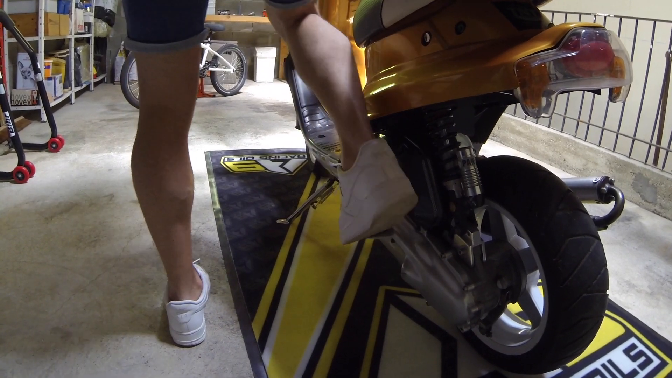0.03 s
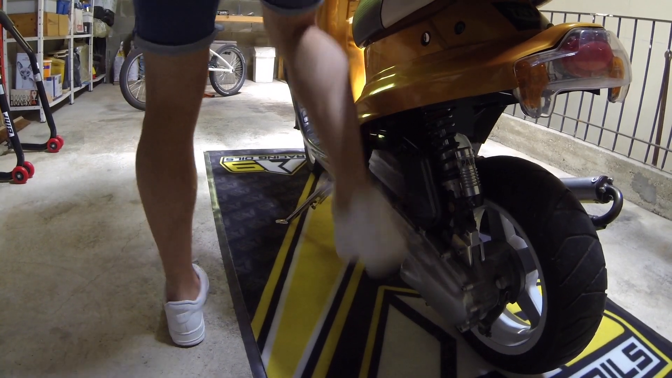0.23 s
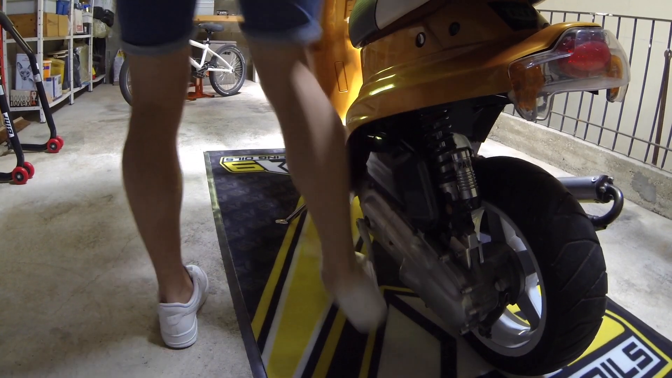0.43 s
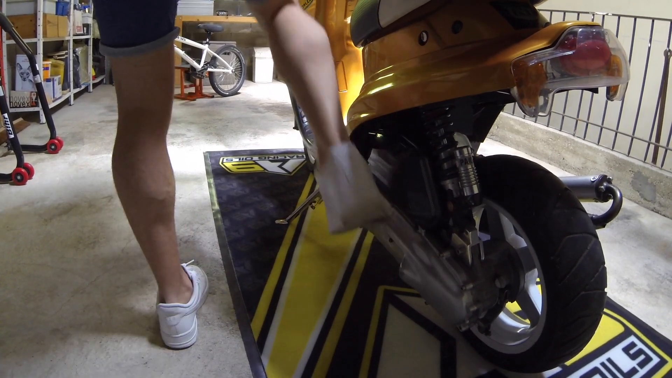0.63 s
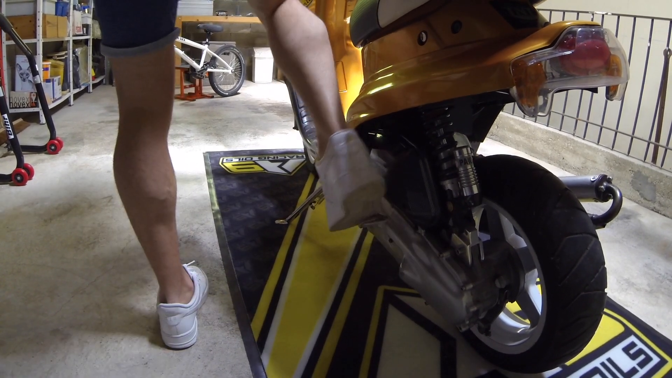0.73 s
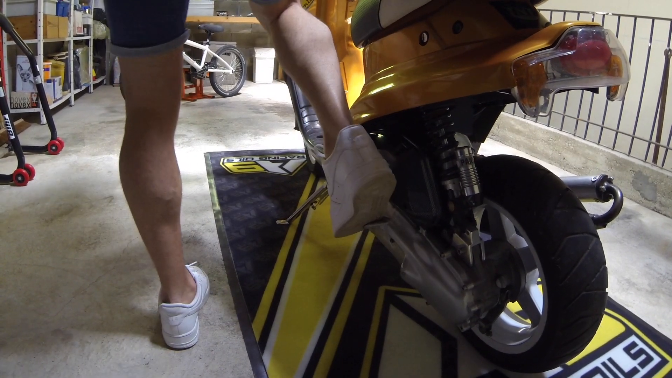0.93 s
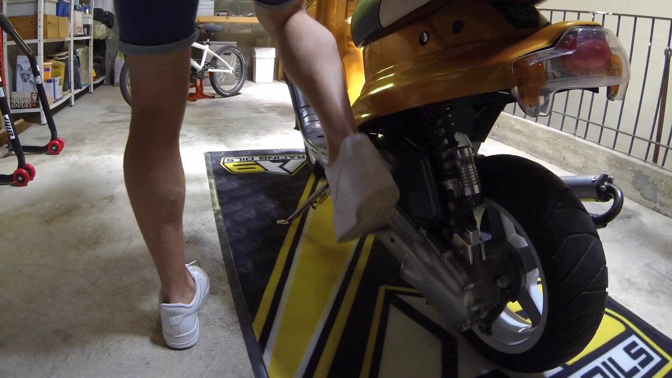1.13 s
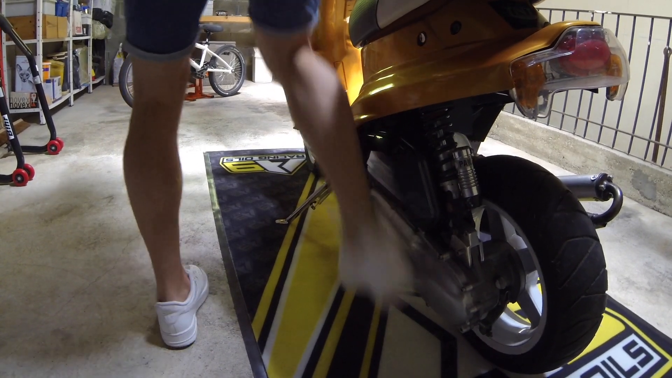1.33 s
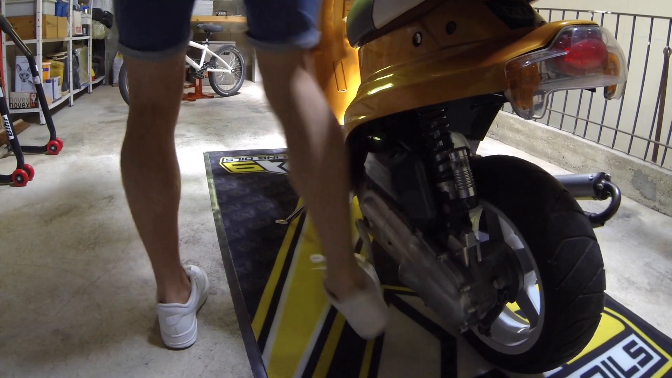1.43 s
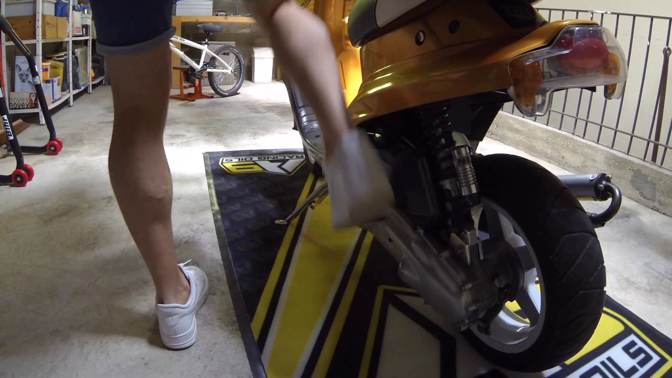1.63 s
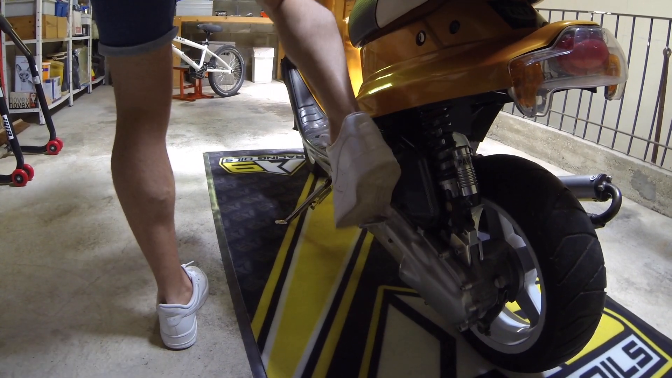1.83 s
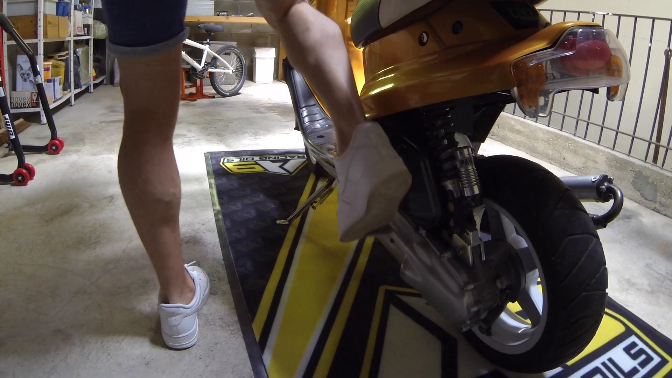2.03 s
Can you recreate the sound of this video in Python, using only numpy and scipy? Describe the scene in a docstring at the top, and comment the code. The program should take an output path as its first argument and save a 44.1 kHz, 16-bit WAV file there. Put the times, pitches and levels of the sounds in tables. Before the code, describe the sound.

Two clanking kicks on a scooter's starter lever turn the engine over without starting it.

```python
"""A starter gear clacks into mesh in a bare garage: a two-stroke scooter is kicked over twice
and does not fire. Each time the gear teeth whirr under the foot and the lever slams on its stop,
exciting the resonances of the transmission case. The piston chuffs cold gas through the exhaust
and loose parts rattle as the engine coasts to rest. Then the lever springs back and rings in its
own modes. The hard walls answer every sound with a short echo."""
import sys
import numpy as np
from scipy import signal
from scipy.fft import rfft, irfft
from scipy.io import wavfile

SR = 44100
rng = np.random.default_rng(int(sys.argv[2]) if len(sys.argv) > 2 else 0)


def waveform_to_disk(signal):
    """Save audio, clipped to [-1, 1], as 16-bit WAV at the path in sys.argv[1]."""
    frames = np.transpose(np.atleast_2d(signal))
    scaled = np.clip(frames, -1, 1) * 32767
    samples = np.round(scaled).astype(np.int16)
    wavfile.write(sys.argv[1], SR, samples)


N = 92610
TIME = np.arange(N) / SR
FFT_SIZE = 2 ** 17
HZ = np.maximum(np.arange(FFT_SIZE // 2 + 1) * SR / FFT_SIZE, 1)

# Still air and distant rumble. Each row: frequency in Hz, gain in dB.
AIR_COLOUR = [(20, -3), (40, 4), (70, -7.5), (110, -15), (200, -20.5), (400, -24), (750, -24.5),
              (1300, -32.5), (2500, -38.5), (5000, -46.5), (9000, -52.5), (15000, -55.5)]
# Decay of the garage. Each row: frequency in Hz, T60 in seconds.
GARAGE_DECAY = [(60, 0.2), (200, .7), (450, 0.64), (750, .7), (1500, 0.53), (3000, 0.39), (6000, 0.52),
                (13000, 0.17)]
# Spectrum of the echo. Each row: frequency in Hz, gain in dB.
GARAGE_COLOUR = [(60, 6), (130, 0.5), (280, 3.5), (500, 3), (800, 0), (1500, 0.5), (2600, 3), (4000, -2),
                 (6000, 1), (13000, -3)]

# The return spring ticks. Each row: start in seconds, relative level in dB.
TICKS = [(.084, -16), (.358, 11), (0.724, -4), (1.461, 1), (1.493, -4.5), (1.708, 2), (1.783, 1.5)]
# Spectrum of a tick. Each row: frequency in Hz, gain in dB.
TICK_COLOUR = [(2000, 25), (6500, -12), (9700, 8.5), (11000, 0.5), (12000, 1), (15000, -13)]

# The drive rubs. Each row: centre in seconds, level in dB, Gaussian half length in seconds.
SQUEAKS = [(1.468, -37.5, .016), (1.559, -38, 0.017)]
# Partials of a squeak. Each row: frequency in Hz, width in Hz, gain in dB.
SQUEAK_PARTIALS = [(1272, 64, -3.5), (1850, 61, -11)]
# The coasting drive rattles, one curve a kick. Each row: time in seconds, level in dB.
RATTLE_CURVES = [
    [(.29, -31), (.36, -56), (.44, -31), (.5, -46), (.58, -45.5), (.63, -64.5)],
    [(1.33, -47), (1.4, -41), (1.47, -35.5), (1.52, -43.5), (1.565, -42.5), (1.62, -49), (1.68, -55)],
]
# Spectrum of the rattle. Each row: frequency in Hz, gain in dB.
RATTLE_COLOUR = [(120, -6), (420, 3.5), (750, 6.5), (1050, 4.5), (1900, -3), (3500, -9), (5500, -21.5),
                 (8000, -35.5), (12000, -34.5), (15000, -45)]

# The gear whirrs under the foot, one curve a kick. Each row: time in seconds, level in dB.
WHIRR_CURVES = [
    [(.15, -56), (.195, -40.5), (.216, -27.5), (.25, -29), (.278, -29.5), (.33, -32), (.39, -47)],
    [(1.19, -49), (1.21, -46), (1.23, -42.5), (1.255, -26.5), (1.285, -31), (1.315, -24.5), (1.37, -39),
     (1.42, -45)],
]
# Spectrum of the whirr. Each row: frequency in Hz, gain in dB.
WHIRR_COLOUR = [(120, -15), (250, -6), (440, -1.5), (560, -8.5), (720, 6.5), (860, 2), (1000, -9.5),
                (1250, -11), (1600, -17.5), (2600, -24), (3800, -27.5), (6500, -46), (14000, -60)]

# The engine turns over, runs down and rocks back; the row at 1.082 s is a low thump as the foot loads the
# lever. Each row: start in seconds, relative level in dB.
CHUFFS = [(.208, 3), (0.257, 6), (.308, 6), (0.361, 0), (.425, -1), (.53, -1.5), (1.082, -13), (1.244, 1),
          (1.295, 6.5), (1.35, 3), (1.408, -0.5), (1.482, -1), (1.584, -2), (1.64, -9.5), (1.772, -9),
          (1.849, -15)]
# Spectrum of a chuff. Each row: frequency in Hz, gain in dB.
CHUFF_COLOUR = [(25, -10), (55, -2.5), (85, -4.5), (125, 6), (180, -13), (240, -6.5), (380, -25.5),
                (900, -38), (3000, -61.5)]

# Resonances of the transmission case. Each row: frequency in Hz, nominal width in Hz, lift in dB.
CASE_RESONANCES = [(440, 69, 4), (782, 370, 13), (1268, 100, 11.5), (1836, 99, 11), (2327, 110, 5.5),
                   (3120, 240, 10.5), (3420, 150, 8.5), (3930, 200, 11.5), (5390, 350, 13),
                   (8800, 970, 6.5), (12300, 820, 5)]
# The slack drive knocks on the case. Each row: start in seconds, relative level in dB.
BACKLASH = [(.433, -7), (0.454, 0.5)]
# Spectrum of that knock. Each row: frequency in Hz, gain in dB.
BACKLASH_COLOUR = [(100, -10), (450, 1.5), (1000, -7.5), (1850, 2.5), (2500, -10.5), (3200, 0), (4500, -9),
                   (7000, -14.5), (12000, -19.5), (15000, -30)]

# The starter gear goes in and out of mesh.
# Each row: start in seconds, relative level in dB, treble gain in dB, contact time in seconds.
CLACKS = [(0.0614, -14, -14.5, 0.01), (0.082, -11, -4, 0.016), (.163, -24.5, -14, 0.0052),
          (0.2019, -11.5, -21, 0.009), (.566, -8, -17, 0.0039), (.833, -26, -16.5, .008),
          (1.019, 2.5, -5.5, 0.008), (1.084, 1.5, -2.5, 0.0082), (1.207, -22, -18, 0.009),
          (1.236, -12.5, -12, 0.0095), (1.558, -5.5, -6, 0.014), (1.916, 3, -17, 0.0075),
          (1.9882, -8.5, -30, 0.0072)]
# Spectrum of a clack. Each row: frequency in Hz, gain in dB.
CLACK_COLOUR = [(60, -23.5), (200, -8.5), (450, 1.5), (1500, -3.5), (2600, -6.5), (4300, -11),
                (4900, -16.5), (8000, -29.5), (12000, -28.5), (15000, -53)]
# Resonances of the gear. Each row: frequency in Hz, nominal width in Hz, lift in dB.
GEAR_RESONANCES = [(783, 260, 11.5), (1114, 73, 10.5), (1830, 150, 9), (2420, 57, 9), (2980, 240, 11),
                   (3640, 200, 14), (4234, 200, 8)]

# The lever springs back to its top stop. Each row: start in seconds, relative level in dB.
RETURNS = [(0.6437, 1), (1.6928, 2)]
# Spectrum of that impact. Each row: frequency in Hz, gain in dB.
RETURN_COLOUR = [(80, -20), (220, -12.5), (450, 6), (750, 3), (1200, -3.5), (1900, -3), (2600, -4.5),
                 (3300, -9.5), (4600, -9.5), (6000, -22.5), (12000, -38.5), (15000, -60)]
# Resonances of the top stop. Each row: frequency in Hz, nominal width in Hz, lift in dB.
TOP_STOP_RESONANCES = [(2500, 180, 3.5), (3960, 360, 8.5), (5150, 320, 5)]
# Modes of the lever. Each row: frequency in Hz, relative level in dB, T60 in seconds.
LEVER_MODES = [(720, -34, .25), (773.4, -26, 0.16), (859, -32.5, 0.22), (1580, -56, .25),
               (1877, -51.5, 0.39), (2732, -45, 0.12)]

# The lever slams on its bottom stop. Each row: start in seconds, relative level in dB.
SLAMS = [(0.2773, 1), (1.3167, 0)]
# Spectrum of a slam. Each row: frequency in Hz, gain in dB.
SLAM_COLOUR = [(40, -9), (130, 2), (300, 4), (700, -4), (1100, -7.5), (2200, -5), (3600, -7), (4700, -12.5),
               (7000, -24.5), (10000, -24), (15000, -38)]


def amp(db):
    """Amplitude grows tenfold every 20 dB."""
    return 10 ** (np.asarray(db) / 20)


def unit_rms(x):
    """Normalisation to unit mean power."""
    return x / np.sqrt(np.mean(x ** 2) + 1e-20)


def decay(age, t60):
    """Exponential damping: 60 dB in t60 seconds."""
    return np.exp(-np.log(1000) * age / t60)


def at_hz(table, hz):
    """Interpolation on a log-frequency axis."""
    frequencies, values = np.transpose(table)
    return np.interp(np.log(hz), np.log(frequencies), values)


def envelope(curves):
    """Amplitude envelope from dB curves, silent outside them."""
    return sum(amp(np.interp(TIME, *np.transpose(c), left=-np.inf, right=-np.inf)) for c in curves)


def body(x, colour, resonances=()):
    """A minimum-phase filter: a broad colour plus damped resonances at least 5% wide."""
    db = at_hz(colour, HZ)
    for hz, width, lift in resonances:
        db += lift / (1 + (2 * (HZ - hz) / max(width, .05 * hz)) ** 2)
    cepstrum = irfft(np.log(amp(db)))
    cepstrum[1:FFT_SIZE // 2] *= 2  # folding makes the response causal
    cepstrum[FFT_SIZE // 2 + 1:] = 0
    return irfft(rfft(x, FFT_SIZE) * np.exp(rfft(cepstrum)))[:N]


def burst(start, length_s):
    """Broadband excitation: a brief noise of unit energy."""
    t = TIME[:SR // 8]
    gate = np.exp(-(t / length_s) ** 4)
    noise = rng.standard_normal(len(t)) * gate
    for _ in range(6):  # flatten the spectrum, then gate again
        phase = np.angle(rfft(noise))
        noise = irfft(np.exp(1j * phase), len(t)) * gate
    return np.pad(noise / np.linalg.norm(noise), (int(start * SR), N))[:N]


def bursts(events, gain_db, length_s):
    """Superposition of one burst for each event."""
    return sum(amp(gain_db + db) * burst(start, length_s) for start, db in events)


def band_noise(low_hz, high_hz):
    """Band-limited noise of unit rms."""
    band = signal.butter(2, [low_hz, high_hz], "band", fs=SR, output="sos")
    return unit_rms(signal.sosfilt(band, rng.standard_normal(N)))


def wavering(low_hz, high_hz):
    """Narrowband noise with a compressed envelope is heard as a rough, wandering tone."""
    tone = signal.hilbert(band_noise(low_hz, high_hz))
    return unit_rms(tone.real / np.sqrt(abs(tone) ** 2 + .5))


def patter(per_s, spread_db=1.5):
    """A Poisson process of small, uneven contacts."""
    contacts = (rng.random(N) < per_s / SR) * rng.choice([-1, 1], N)
    return contacts * amp(spread_db * rng.standard_normal(N))


def paths(sound, room_db):
    """Sound takes two paths: to the listener and to the walls."""
    return np.array([sound, amp(room_db) * sound])


def struck(force, colour, resonances, room_db):
    """Forced response of a body on both paths, with weaker resonances towards the walls."""
    softened = [(hz, width, .2 * lift) for hz, width, lift in resonances]
    return np.array([body(force, colour, resonances), amp(room_db) * body(force, colour, softened)])


def air():
    """Ambient noise: a steady, faint rumble."""
    return amp(-49.5) * unit_rms(body(rng.standard_normal(N), AIR_COLOUR))


def garage_response(wall_delay_s=.0024, early_s=.059, bands=16):
    """Reverberation: dense early reflections, then a tail that dies band by band."""
    white = rfft(rng.standard_normal(N), FFT_SIZE)
    centres = np.geomspace(50, SR / 3, bands)
    onset = np.clip(TIME / wall_delay_s - 1, 0, 1) * (1 + np.exp(-TIME / early_s))
    echo = 0
    for hz, share in zip(centres, np.eye(bands)):
        band = irfft(white * np.interp(np.log(HZ), np.log(centres), share))[:N]
        fade = onset * decay(TIME, at_hz(GARAGE_DECAY, hz))
        echo += band * fade / np.linalg.norm(fade)
    return body(echo, GARAGE_COLOUR)


def spring_ticks():
    """Light impacts of the spring radiate thin metallic ticks."""
    force = bursts(TICKS, gain_db=-32, length_s=.015)
    return paths(body(force, TICK_COLOUR), room_db=-3)


def coasting_drive():
    """Random impacts rattle and friction squeaks as the engine runs down."""
    rubbing = sum(amp(db) * np.exp(-.5 * ((TIME - centre) / half_s) ** 2)
                  for centre, db, half_s in SQUEAKS)
    squeak = sum(amp(db) * wavering(hz - width / 2, hz + width / 2) for hz, width, db in SQUEAK_PARTIALS)
    rattle = unit_rms(body(patter(per_s=800), RATTLE_COLOUR))
    return paths(envelope(RATTLE_CURVES) * rattle + rubbing * squeak, room_db=-5)


def gear_whirr(tooth_hz=432.6, jitter=.24, spread_db=3, grit_gain=.77):
    """Teeth pulse at an unsteady meshing frequency, with grit between them."""
    teeth = np.cumsum(tooth_hz * (1 + jitter * band_noise(20, 200))) / SR
    contacts = np.diff(np.floor(teeth), prepend=0)
    meshing = unit_rms(contacts * amp(spread_db * rng.standard_normal(N)))
    grit = unit_rms(rng.standard_normal(N) * (1 - teeth % 1))
    whirr = unit_rms(body(meshing + grit_gain * grit, WHIRR_COLOUR))
    return paths(envelope(WHIRR_CURVES) * whirr, room_db=-3)


def exhaust_chuffs():
    """Volume displacement: the piston pushes puffs of cold gas through the exhaust; a low thump as the foot
    loads the lever shares their colour."""
    puffs = bursts(CHUFFS, gain_db=17.5, length_s=.04)
    return paths(body(puffs, CHUFF_COLOUR), room_db=-2.5)


def drive_backlash():
    """Backlash: the slack drive knocks twice and excites the case."""
    force = bursts(BACKLASH, gain_db=2.5, length_s=.013)
    return struck(force, BACKLASH_COLOUR, CASE_RESONANCES, room_db=0)


def gear_clacks(gain_db=-2, treble_hz=6000):
    """Tooth impacts excite the gear's resonances; each contact has its own brightness."""
    force = 0
    for start, db, treble_db, contact_s in CLACKS:
        hit = burst(start, contact_s)
        dull = signal.lfilter(*signal.butter(1, treble_hz, fs=SR), hit)
        force += amp(gain_db + db) * (dull + amp(treble_db) * (hit - dull))
    return struck(force, CLACK_COLOUR, GEAR_RESONANCES, room_db=0)


def lever_returns(contact_s=.011):
    """Free vibration: the lever hits its top stop, rings in damped modes and buzzes on its shaft."""
    force = bursts(RETURNS, gain_db=.5, length_s=contact_s)
    knocks = struck(force, RETURN_COLOUR, TOP_STOP_RESONANCES, room_db=-1.5)
    ring = 0
    for start, db in RETURNS:
        age = np.maximum(TIME - start, 0)
        onset = np.minimum(2 * age / contact_s, 1)
        modes = sum(amp(mode_db) * np.sin(2 * np.pi * hz * age) * decay(age, t60)
                    for hz, mode_db, t60 in LEVER_MODES)
        buzz = amp(-31) * wavering(660, 840) * decay(age, t60=.33)
        ring += amp(db) * onset * (modes + buzz)
    return knocks + paths(ring, room_db=-14)


def lever_slams(gain_db=19.5, contact_s=.0068, chatter_db=-13.5, chatter_s=.02):
    """Impact excitation: the lever hits bottom, shakes the case and sets loose panels chattering."""
    force = 0
    for start, db in SLAMS:
        age = TIME - start - contact_s
        chatter = patter(per_s=600) * (age > 0) * np.exp(-abs(age) / chatter_s)
        chatter *= amp(chatter_db) / np.linalg.norm(chatter)
        force += amp(gain_db + db) * (burst(start, contact_s) + chatter)
    return struck(force, SLAM_COLOUR, CASE_RESONANCES, room_db=-.5)


def scene():
    """Superposition of the scooter's direct sound, its reverberation and the air."""
    soft = spring_ticks() + exhaust_chuffs() + gear_whirr() + coasting_drive()
    impacts = lever_slams() + gear_clacks() + drive_backlash() + lever_returns()
    direct, to_walls = soft + impacts
    return (air() + direct + signal.fftconvolve(to_walls, garage_response())[:N])[None]


def record(dry, cutoff_hz=15800):
    """Soft saturation rounds the loudest peaks; a steep low-pass cuts the top."""
    lowpass = signal.ellip(10, .1, 80, cutoff_hz, fs=SR, output="sos")
    return signal.sosfilt(lowpass, np.tanh(dry))


dry = scene()
out = record(dry)
waveform_to_disk(out)
```